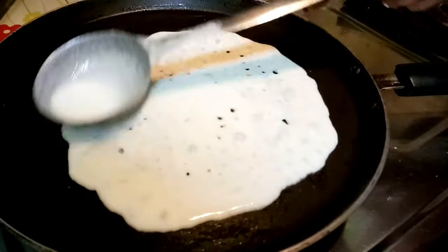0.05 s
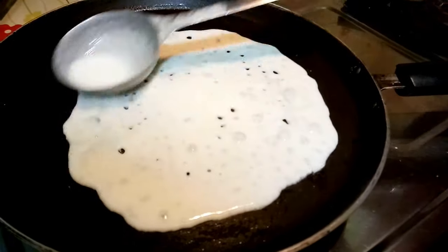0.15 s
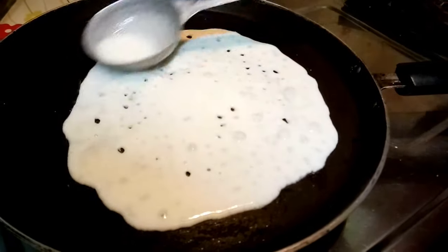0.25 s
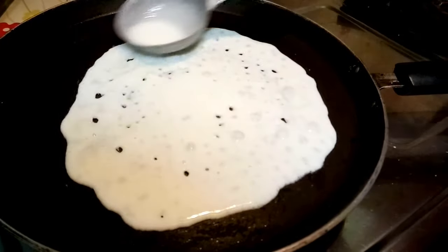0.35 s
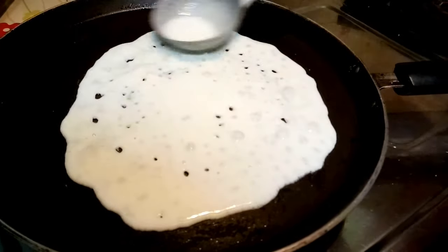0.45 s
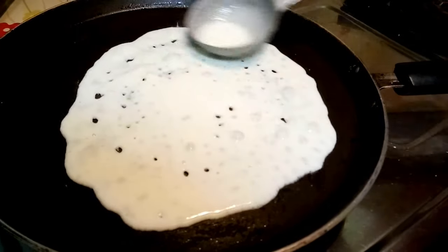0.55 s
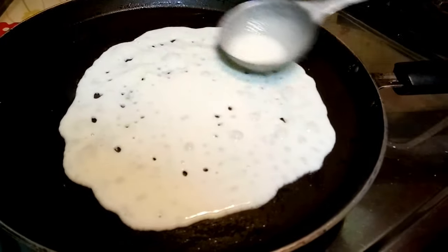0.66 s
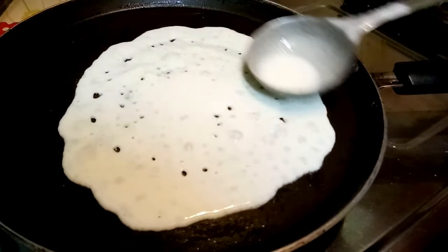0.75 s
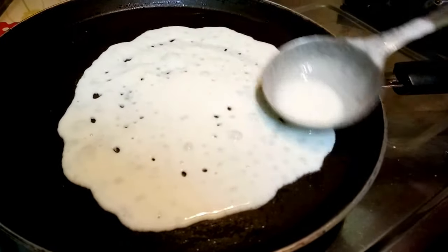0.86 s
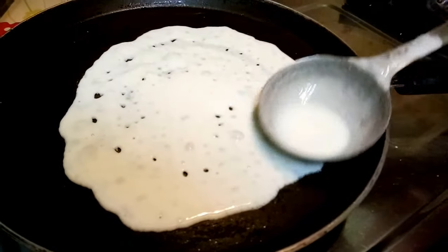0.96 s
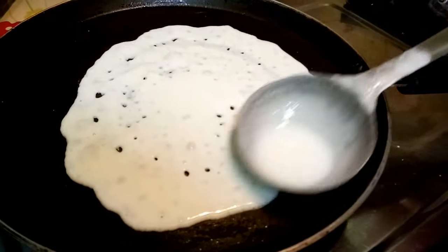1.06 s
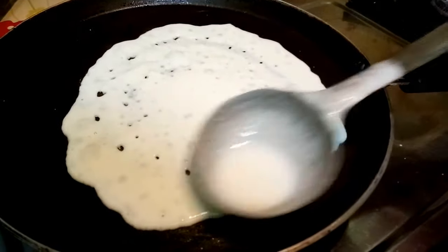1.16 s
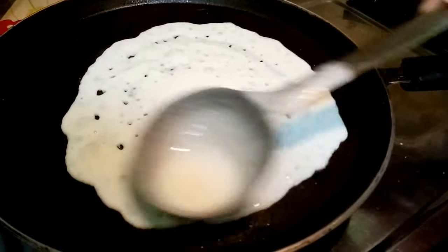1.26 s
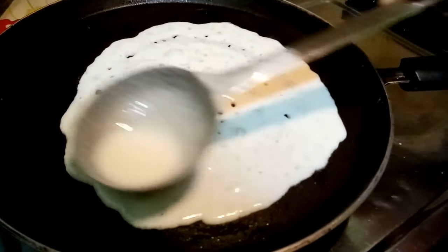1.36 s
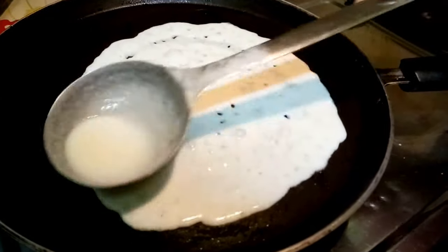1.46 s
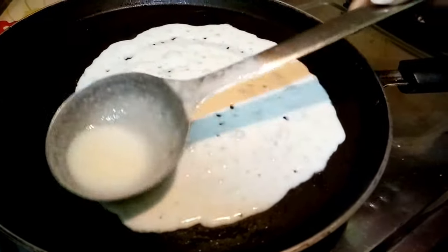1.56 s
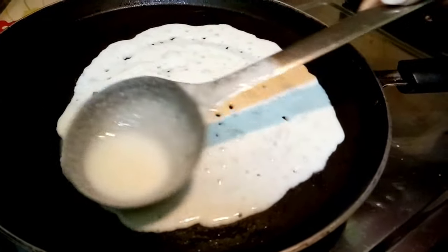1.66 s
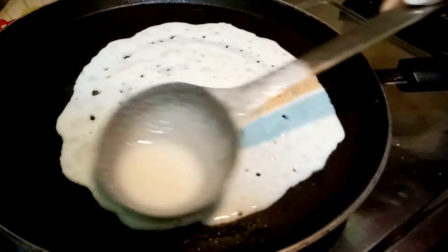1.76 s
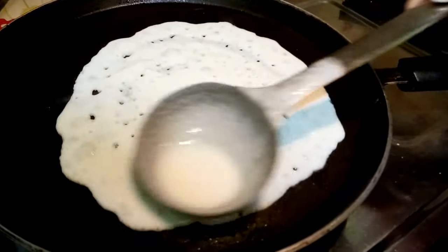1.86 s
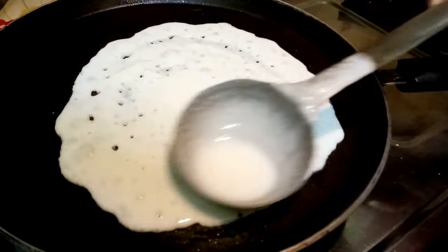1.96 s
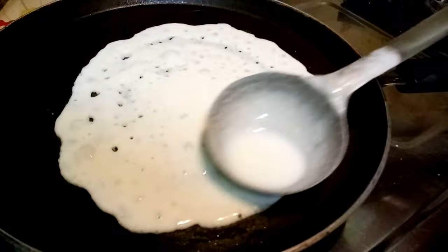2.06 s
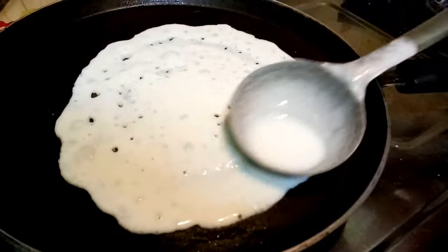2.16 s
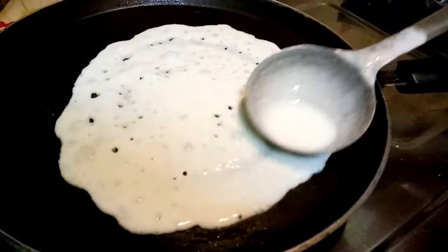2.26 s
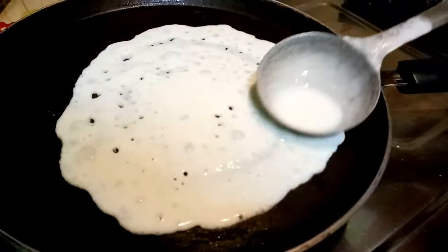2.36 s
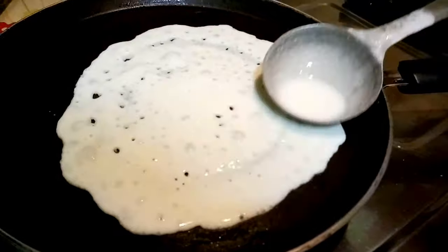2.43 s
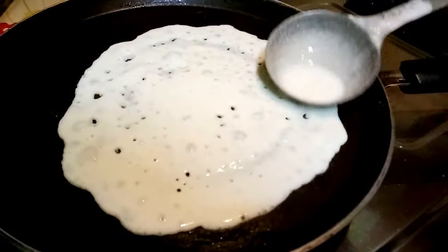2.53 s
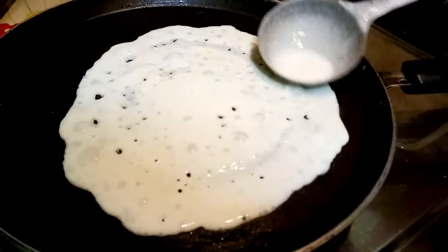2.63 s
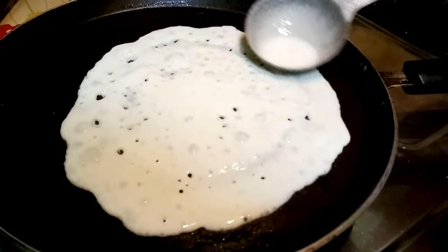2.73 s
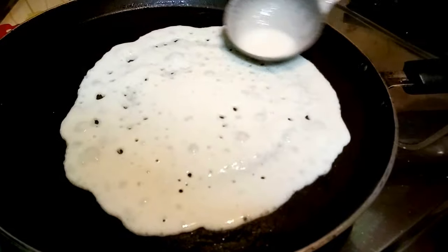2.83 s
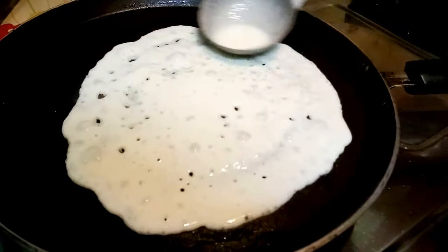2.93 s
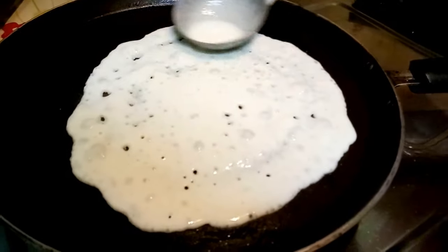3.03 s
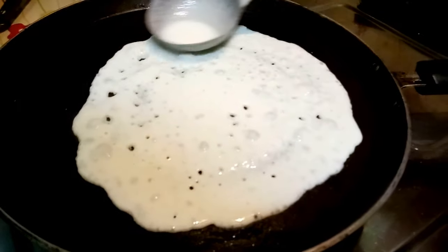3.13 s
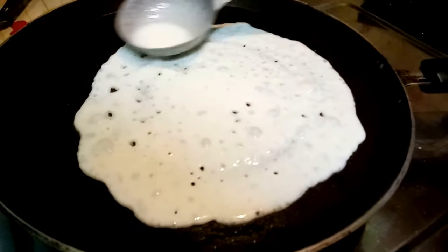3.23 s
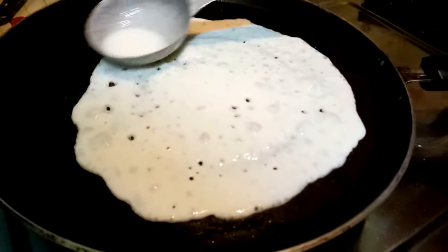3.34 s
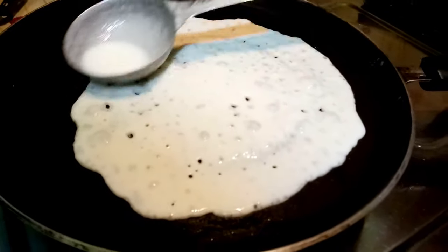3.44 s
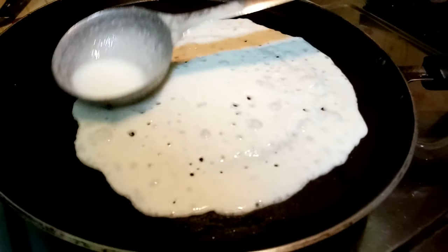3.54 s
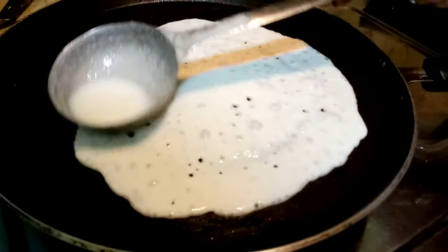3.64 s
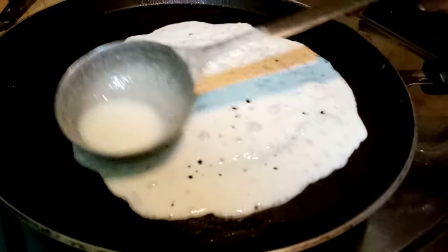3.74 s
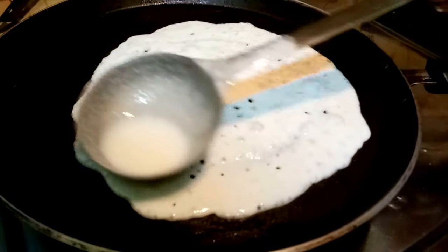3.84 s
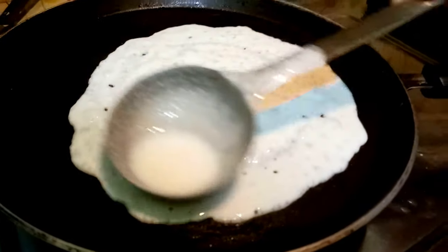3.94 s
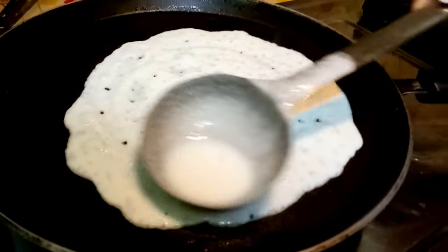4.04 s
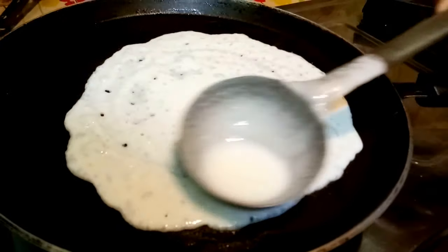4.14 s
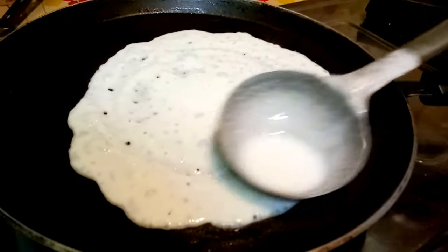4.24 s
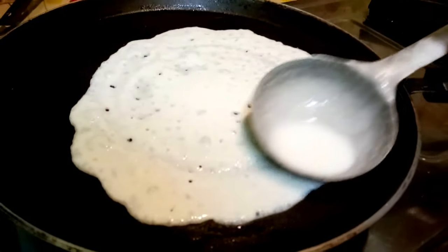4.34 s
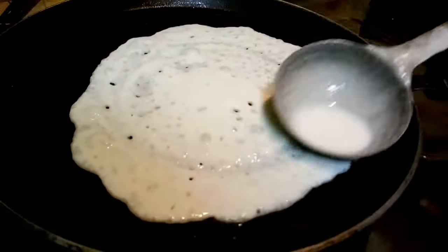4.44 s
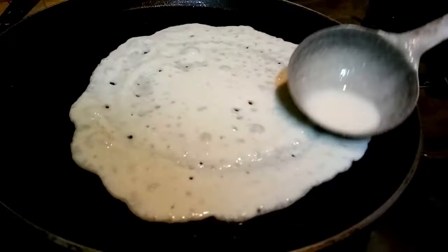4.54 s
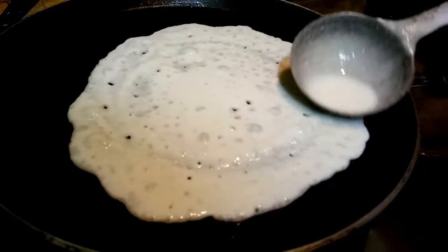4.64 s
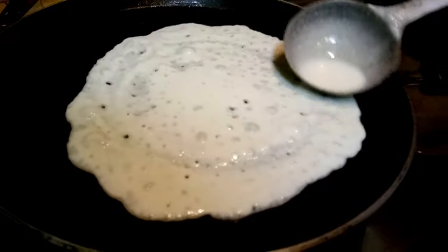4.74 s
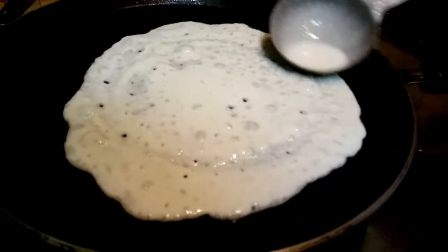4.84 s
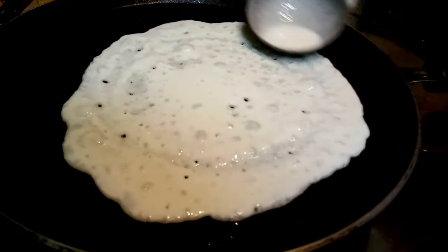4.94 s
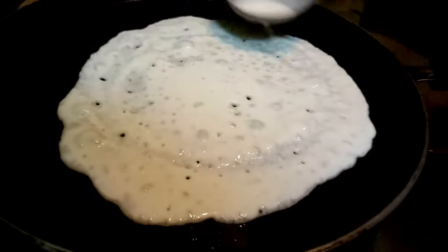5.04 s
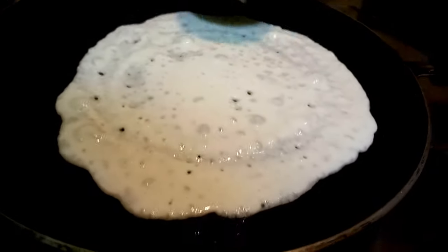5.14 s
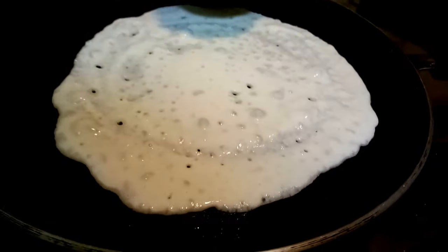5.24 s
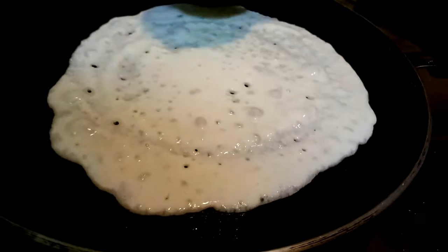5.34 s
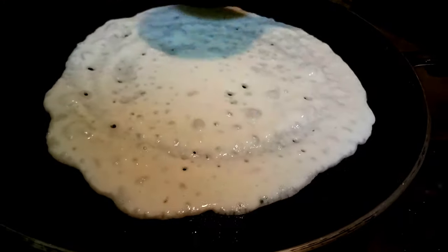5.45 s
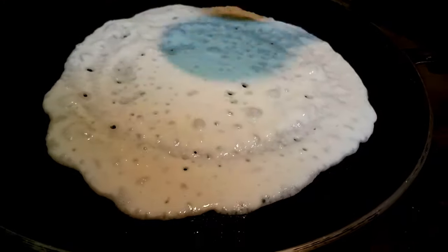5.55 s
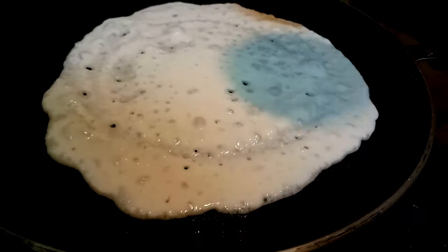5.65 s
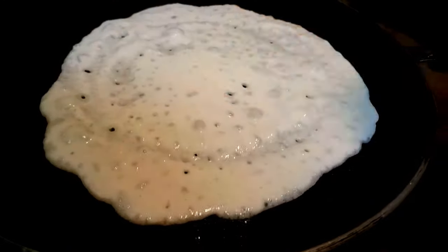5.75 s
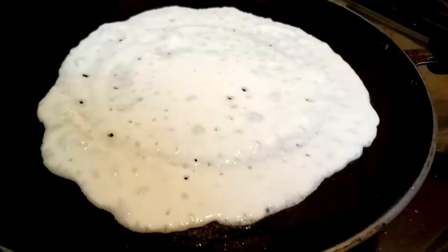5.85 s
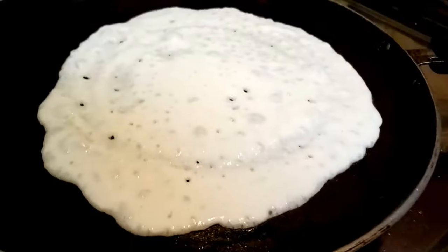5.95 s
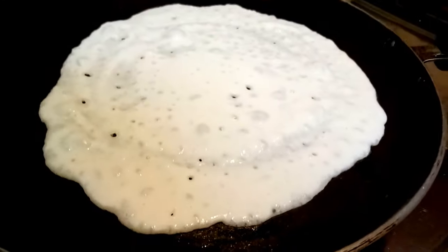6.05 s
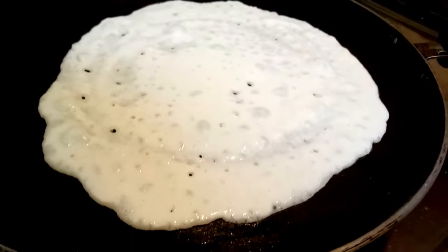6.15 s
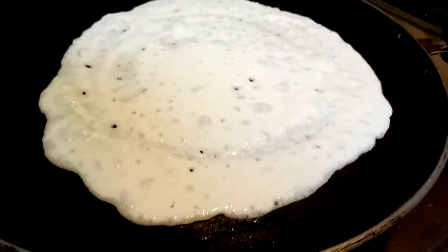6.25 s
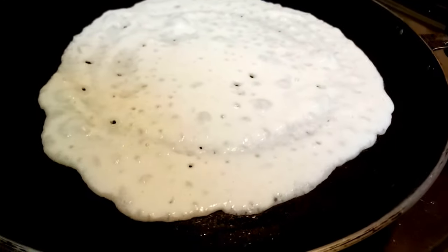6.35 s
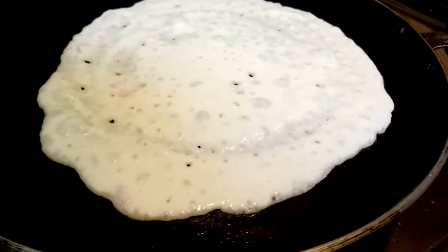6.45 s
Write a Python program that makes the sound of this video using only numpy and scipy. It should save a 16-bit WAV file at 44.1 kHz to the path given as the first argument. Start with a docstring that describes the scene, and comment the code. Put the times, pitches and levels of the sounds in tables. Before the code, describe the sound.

A steady treble-heavy sizzle made of countless tiny steam bursts, heard very near in a small dry-sounding kitchen. At first it is full and wet, with few pops; after about three seconds hard snaps arrive in spurts, each briefly ducking the hiss. The sizzle fades as the batter sets, leaving sparser crackles and a flurry of pops over quiet rumble.

```python
"""A hiss in spurts: thin batter sizzles on a hot oiled pan in a kitchen, close to one microphone. Thousands of
tiny random clicks, coloured by the pan, make the hiss of bursting steam bubbles. Sparser clicks make the oil
crackle; torn noise bursts make the blisters pop, and a short low thump comes with each. A limiter in the
recorder ducks everything for an instant around each hard pop. The hiss fades as the batter sets and bares the
crackles, over soft room rumble and faint mains hum."""
import sys
import numpy as np
from scipy import signal
from scipy.fft import rfft, irfft, next_fast_len
from scipy.io import wavfile
from scipy.ndimage import uniform_filter1d, minimum_filter1d

SR = 44100
rng = np.random.default_rng(int(sys.argv[2]) if len(sys.argv) > 2 else 0)


def waveform_to_disk(signal):
    """Save audio, clipped to [-1, 1], as 16-bit WAV at the path in sys.argv[1]."""
    frames = np.transpose(np.atleast_2d(signal))
    scaled = np.clip(frames, -1, 1) * 32767
    samples = np.round(scaled).astype(np.int16)
    wavfile.write(sys.argv[1], SR, samples)


N = 286253
T = np.arange(N) / SR
EDGE_HZ = 15560  # upper band limit of bursts and recorder

# How hard the batter boils. Each row: time in seconds, relative hiss level in dB.
BOIL_LEVEL = [(0.0, -24.5), (0.96, -23), (1.04, -28.5), (1.24, -24), (1.36, -28), (1.44, -23.0),
              (2.24, -27), (2.68, -25), (3.28, -25), (3.36, -29.1), (3.92, -27), (3.96, -32), (4.48, -28),
              (4.52, -30), (4.64, -28.5), (5.24, -30.5), (5.6, -33), (5.72, -29.0), (5.8, -32.5),
              (5.88, -32), (6.2, -35), (6.49, -35)]


def amp(db):
    """Decibels to gain."""
    return 10 ** (np.asarray(db) / 20)


def evened(x):
    """Scales x to unit power."""
    return x / np.sqrt(np.mean(x ** 2) + 1e-20)


def curve(rows):
    """Joins the rows of a table by straight lines in time, one curve a column."""
    s, *columns = np.transpose(rows)
    return [np.interp(T, s, c) for c in columns]


def read(points, hz):
    """Reads a spectrum on a logarithmic frequency axis."""
    f, db = np.transpose(points)
    return np.interp(np.log(hz + 1), np.log(f + 1), db)


def shaped(x, gain):
    """Filters x by a gain given as a function of frequency."""
    size = next_fast_len(N + SR // 10)
    spectrum = rfft(x, size) * gain(np.fft.rfftfreq(size, 1 / SR))
    return irfft(spectrum, size)[:N]


def wander(rate_hz):
    """Smooth chance of unit power that changes about rate_hz times a second."""
    noise = rng.standard_normal(N)
    return evened(shaped(noise, lambda hz: 1 / (1 + (hz / rate_hz) ** 2)))


def clicks(per_s, spread_db, largest):
    """Random sharp clicks of unequal size; largest caps the size, in spreads above the typical one."""
    size = amp(spread_db * np.minimum(rng.standard_normal(N), largest))
    sign = rng.choice([-1, 1], N)
    return size * sign * (rng.random(N) < per_s / SR)


def burst_colour(hz):
    """Broad colour of a burst at the microphone, lifted at each resonance of the pan and stove."""
    # Broad spectrum. Each row: frequency in Hz, relative level in dB per Hz.
    broad = [(100, -44.5), (450, -32.5), (680, -26.5), (900, -28.5), (1700, -21), (2400, -13), (3900, -11),
             (5000, -5), (6400, 0), (8000, -6), (9700, 0.5), (12000, -4.5), (13600, -7.5), (14600, 3),
             (15400, 3)]
    # Resonances of pan and stove. Each row: frequency in Hz, width in Hz, lift in dB.
    resonances = [(334, 66, 7), (645, 35, 5), (746, 36, 7), (1093, 240, 6), (1333, 21, 5), (1617, 30, 5.5),
                  (2170, 89, 1.5), (2650, 100, 1.5), (3584, 43, 6), (4410, 190, 2.5), (6610, 260, 2.5)]
    lift_db = sum(db / (1 + (2 * (hz - f) / width) ** 2) for f, width, db in resonances)
    return amp(read(broad, hz) + lift_db) * (hz < EDGE_HZ)


def snap_colour(hz):
    """The colour of a burst, scaled so that a click keeps its peak."""
    return burst_colour(hz) / burst_colour(np.linspace(0, SR / 2, num=200)).mean()


def steam_flow(flutter_db, flutter_hz):
    """Gain of the sizzle: the boil, its slight chance swells, spurts of steam and a quick flutter."""
    # Steam forcing its way out. Each row: start in seconds, length in seconds, change of level in dB.
    spurts = [(0.15, 0.14, 1.5), (0.616, 0.013, 1), (2.126, 0.046, 3), (2.653, 0.07, 2), (3.054, 0.015, 4),
              (3.249, 0.015, 6), (3.806, 0.013, 6.5), (4.433, 0.025, 3), (4.855, 0.033, 4),
              (5.504, 0.009, 7), (5.57, 0.0083, 9), (5.704, 0.01, 2), (5.822, 0.0063, 12.5)]
    swell_db, swell_hz = 0.02, 4.5
    level_db = curve(BOIL_LEVEL)[0] + swell_db * wander(swell_hz)
    level_db = level_db + flutter_db * wander(flutter_hz)
    for s, length, db in spurts:
        from_middle = T - s - length / 2
        corners = length * np.array([-.62, -.38, .38, .62])  # sloping edges
        level_db = level_db + db * np.interp(from_middle, corners, [0, 1, 1, 0])
    return amp(level_db)


def hiss(mist_db, split_hz, fine_hz, waver_db, trim_db, bubbling_db):
    """Dense tiny bursts over a mist of steam; wet batter bubbles low, drying batter fizzes finer."""
    # Level of the treble against the middle of the hiss. Each row: time in seconds, lift in dB.
    treble = [(0.0, -3.5), (1.56, 0.3), (2.16, -1.25), (3.28, -1.0), (3.48, 2.5), (4.4, 3), (4.84, -2.5),
              (5.04, 4), (5.16, -0.1), (6.49, 1.5)]
    # Low bubbling of the wet batter. Each row: time in seconds, level in dB before the trims.
    low_bubbling = [(0.0, -44), (0.22, -39), (0.49, -46), (0.58, -41), (1.28, -46), (1.45, -43.5),
                    (2.28, -44), (2.31, -49), (2.37, -46.5), (3.0, -43), (4.14, -52), (4.45, -46.5),
                    (4.54, -55), (4.55, -49), (6.36, -56), (6.49, -55)]
    level_db = curve(BOIL_LEVEL)[0]
    # bubbling and treble each waver a little by chance
    wet_db = curve(low_bubbling)[0] + bubbling_db - level_db + waver_db * wander(rate_hz=8.5)
    fine_db = curve(treble)[0] + waver_db * wander(rate_hz=25)

    per_s = 13000 * amp(1.4 * (level_db - level_db.max()))  # a weaker boil has fewer bubbles
    bursts = evened(clicks(per_s, spread_db=6.5, largest=2.76) / np.sqrt(per_s))
    drive = bursts + amp(mist_db) * rng.standard_normal(N)

    fizz = evened(shaped(drive, lambda hz: burst_colour(hz) * (1 - 1 / (1 + (hz / split_hz) ** 4))))
    fine = shaped(fizz, lambda hz: 1 - 1 / (1 + (hz / fine_hz) ** 8))
    bubbling = evened(shaped(drive, lambda hz: burst_colour(hz) / (1 + (hz / split_hz) ** 4)))
    tilt = amp(fine_db / 2)
    sound = (fizz - fine) / tilt + fine * tilt + amp(wet_db) * bubbling
    return amp(trim_db) * steam_flow(flutter_db=1.79, flutter_hz=49) * sound


def crackles(octaves, skirt_db, trim_db, count=14):
    """Droplets burst in the oil, more often in spurts of steam; each droplet size favours its own pitch."""
    # The oil spits less as the pan dries.
    # Each row: time in seconds, crackles per second in even steam, typical size in dB before the trim.
    spitting = [(0, 470, -16), (3, 450, -19), (4.3, 210, -21), (5.4, 180, -20.5), (6.49, 180, -21)]
    per_s, size_db = curve(spitting)
    per_s = per_s * steam_flow(flutter_db=1.5, flutter_hz=26.1) / amp(curve(BOIL_LEVEL)[0])
    out = np.zeros(N)
    for pitch in np.geomspace(2000, 15000, count):
        train = clicks(per_s / count, spread_db=6.5, largest=0.5)
        # a band around the pitch, on a faint full-range skirt
        out += shaped(train, lambda hz: amp(skirt_db) + np.exp(-(np.log2((hz + 1) / pitch) / octaves) ** 2))
    return amp(trim_db + size_db) * shaped(out, snap_colour)


def background():
    """Soft room rumble of filtered noise that swells and sinks a little, and mains hum of pure tones."""
    # Kitchen rumble. Each row: frequency in Hz, relative level in dB per Hz.
    kitchen = [(20, 2), (70, -0.5), (150, 0), (240, -4.5), (330, 5), (480, -15.5), (1000, -27),
               (4000, -13.5)]
    # Mains hum. Each row: frequency in Hz, level in dB rms.
    mains = [(50, -72.5), (100, -79.5), (150, -82)]
    rumble_db = -63
    rumble = evened(shaped(rng.standard_normal(N), lambda hz: amp(read(kitchen, hz))))
    rumble = rumble * amp(1.3 * wander(rate_hz=11))
    hum = sum(amp(db) * np.sqrt(2) * np.sin(2 * np.pi * (hz * T + rng.random())) for hz, db in mains)
    return amp(rumble_db) * rumble + hum


def pops(thump_s, ragged_s, snap_db, thump_db):
    """A blister snaps in a ragged millisecond and rings above hearing, with one short low thump."""
    # Single blisters. Each row: time in seconds, level of the snap over 3 ms in dB before its trim,
    # treble lift in dB, peak of the ultrasonic ring in dB, peak of the low thump in dB before its trim.
    blisters = [(0.744, -28, 7.5, -3, -50), (1.251, -27.5, 8, -2.5, -45), (1.9187, -28, 5, -20.5, -33),
                (2.018, -23, 5, -4.5, -46), (2.3165, -17, 3, 2.5, -29), (2.4955, -21, -2.5, -20, -52),
                (2.766, -21, 10, 0, -35), (3.132, -30, 8, -1, -48), (3.292, -15.5, 7, -6, -19.5),
                (3.5003, -22, 11, -14, -34), (3.766, -19, 8, -8.5, -27), (3.9322, -14, 6, -1, -14.5),
                (3.9746, -25, 12, -15, -30), (4.013, -25.5, 0, -20, -56), (4.087, -25, 14, -20, -50),
                (4.399, -23.5, 8, -18, -39), (4.51, -18, 6, 0, -26), (4.888, -14, 15, -5.5, -28),
                (4.9992, -23, 13, -16, -54), (5.3563, -20, 14, -1, -35), (5.5978, -21, 14, 0, -32),
                (5.75, -37, 9.5, 9, -29), (5.781, -31, -29, -20, -55), (5.8403, -28, 5, -20, -49),
                (5.899, -30, 14, -20, -55), (5.975, -26, 12, -20, -42), (6.019, -19, -3, -8, -26.5),
                (6.054, -31, 6, -20, -53), (6.0742, -25.5, 1, -20, -48), (6.0924, -19, 7, -11, -34),
                (6.23, -42.5, 10.5, 5, -33), (6.246, -25.5, -4, -20, -60), (6.2998, -24, -1, -20, -57),
                (6.328, -28.5, 8, -20, -58), (6.3723, -28.5, 11, -22, -48), (6.4102, -35, 15, -22, -58)]
    ring_hz, ring_s = 19500, .0004  # above the recorder's band, but it still drives the limiter
    lead = 256  # samples of room ahead of the pop
    out, age, hz = np.zeros(N + 4096), T[:2048], np.fft.rfftfreq(2048, 1 / SR)
    ring = np.exp(-((age - age[lead]) / ring_s) ** 2) * np.cos(2 * np.pi * ring_hz * age)
    thump = np.roll((age / thump_s - 1) * np.exp(-age / thump_s), lead)
    for s, high_db, bright_db, ring_db, low_db in blisters:
        # one sharp click with a ragged noise tail
        tear = 0.5 * rng.standard_normal(len(age)) * np.exp(-age / ragged_s) - (age == 0)
        colour = burst_colour(hz) * amp(bright_db / (1 + (7700 / (hz + 1)) ** 6))
        snap = np.roll(irfft(rfft(tear) * colour), lead)
        snap *= np.sqrt(.003 * SR / np.sum(snap ** 2))  # unit power over 3 ms
        at = int(np.clip(round(s * SR) - lead, 0, N))
        pop = amp(snap_db + high_db) * snap + amp(ring_db) * ring + amp(thump_db + low_db) * thump
        out[at:at + len(age)] += pop
    return out[:N]


def blips(length_s, width_hz):
    """Faint, short low blips under the sizzle: narrow bands of noise that swell and die."""
    # Each row: time of the peak in seconds, pitch in Hz, level at the peak in dB.
    low_notes = [(4.44, 720, -61), (4.45, 324, -62), (5.67, 320, -59), (5.95, 550, -61.5), (5.98, 302, -59)]
    out = np.zeros(N)
    for s, pitch, db in low_notes:
        band = evened(shaped(rng.standard_normal(N), lambda hz: np.exp(-((hz - pitch) / width_hz) ** 2)))
        out += amp(db) * np.exp(-((T - s) / length_s) ** 2) * band
    return out


def room(x, t60, wet_db):
    """Weak, quickly dying reflections from the stove and walls: sparse random echoes."""
    t = T[:SR // 2]
    sparse = rng.standard_normal(len(t)) * (rng.random(len(t)) < .1)
    taps = sparse * (t > .001) * amp(-60 * t / t60)  # 60 dB down after t60 seconds
    return x + amp(wet_db) * signal.oaconvolve(x, taps / np.linalg.norm(taps))[:N]


def scene():
    """The pan in its room, over the blips and the background."""
    pan = hiss(mist_db=-8.5, split_hz=2746, fine_hz=8900, waver_db=1.5, trim_db=-1.23, bubbling_db=1.5)
    pan = pan + crackles(octaves=0.43, skirt_db=-23, trim_db=5.0)
    pan = pan + pops(thump_s=0.00064, ragged_s=0.00038, snap_db=2.0, thump_db=-3.0)
    pan = room(pan, t60=0.084, wet_db=-12)
    return (pan + blips(length_s=0.025, width_hz=105) + background())[None]


def record(dry):
    """A look-ahead limiter turns everything down around each peak above its ceiling; then the band limit."""
    ceiling_db = -5.5
    hold_s, attack_s, release_s = .02, .003, 0.0094  # time held around a peak, smoothing, recovery
    spare_db = ceiling_db - 20 * np.log10(abs(dry[0]) + 1e-9)
    cut_db = np.maximum(-minimum_filter1d(spare_db, size=max(round(hold_s * SR), 1)), 1e-9)
    # after each peak the cut in dB dies away exponentially
    cut_db = np.exp(np.maximum.accumulate(np.log(cut_db) + T / release_s) - T / release_s)
    held = dry / amp(uniform_filter1d(cut_db, size=max(round(attack_s * SR), 1)))
    band_limit = signal.firwin(401, EDGE_HZ, window=("kaiser", 8), fs=SR)
    return signal.oaconvolve(held, band_limit[None], "same")


dry = scene()
out = record(dry)
waveform_to_disk(out)
```